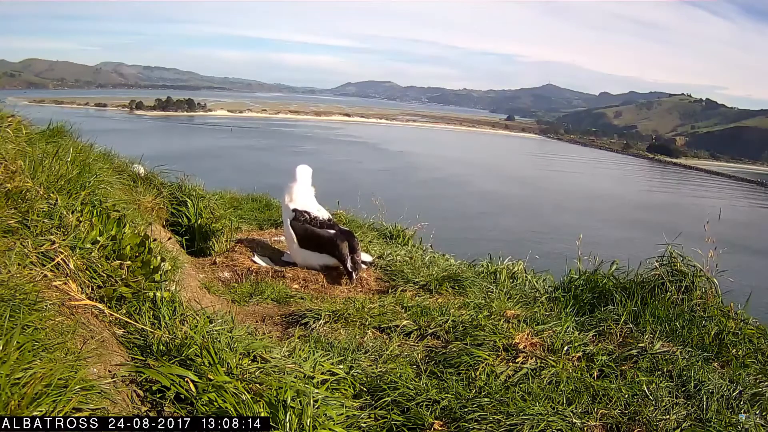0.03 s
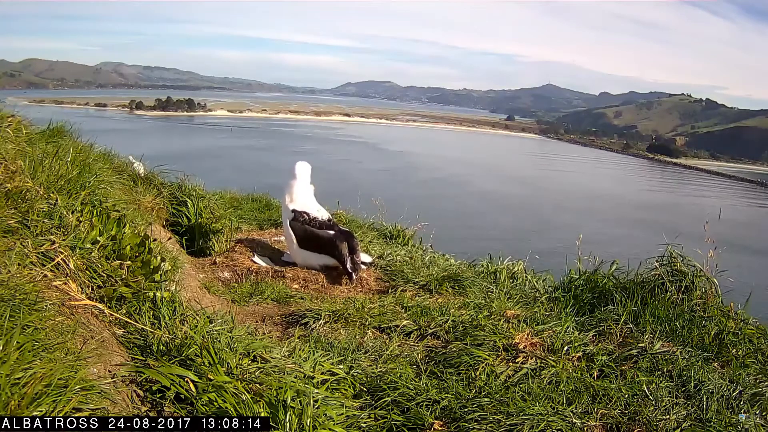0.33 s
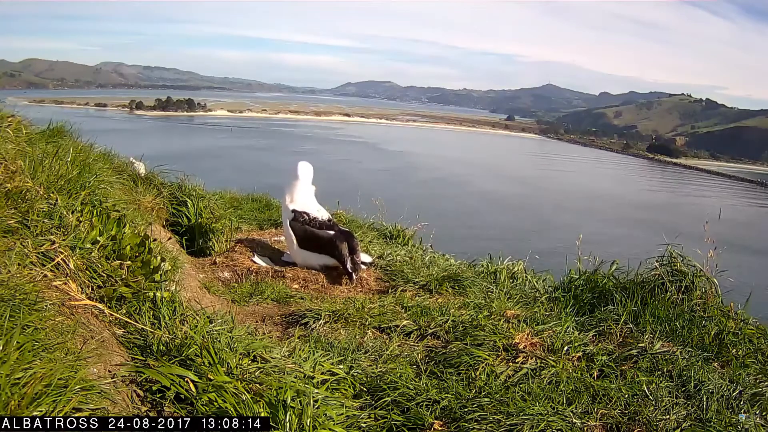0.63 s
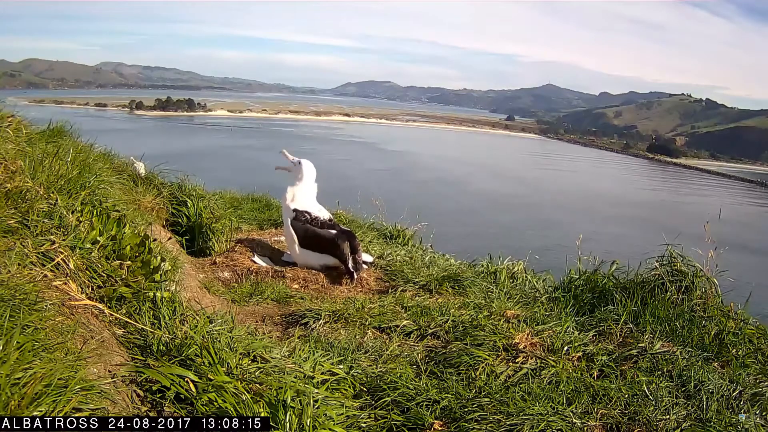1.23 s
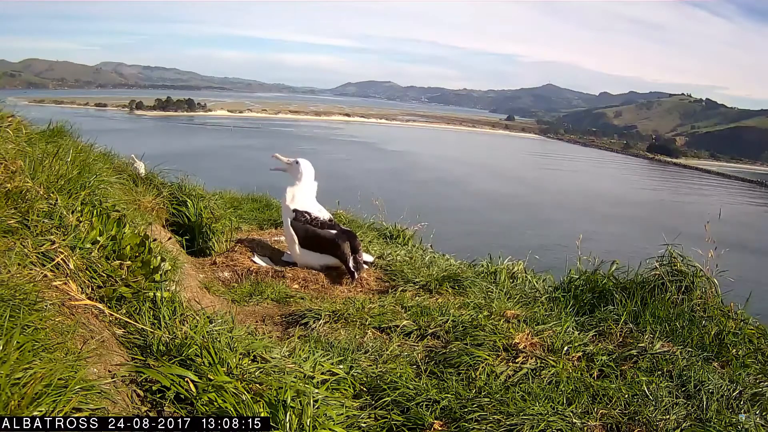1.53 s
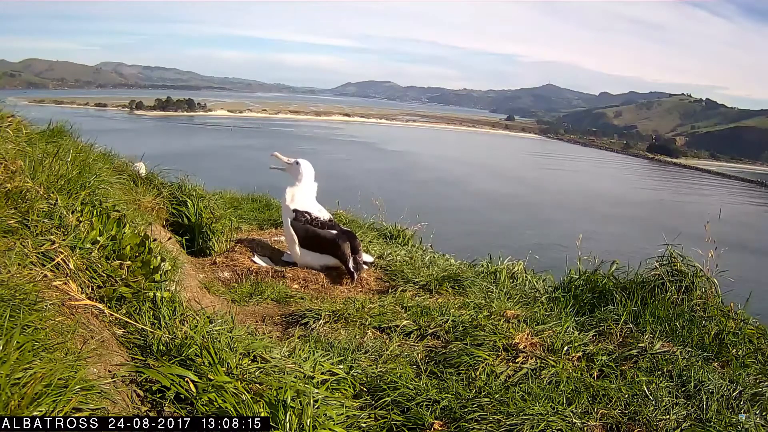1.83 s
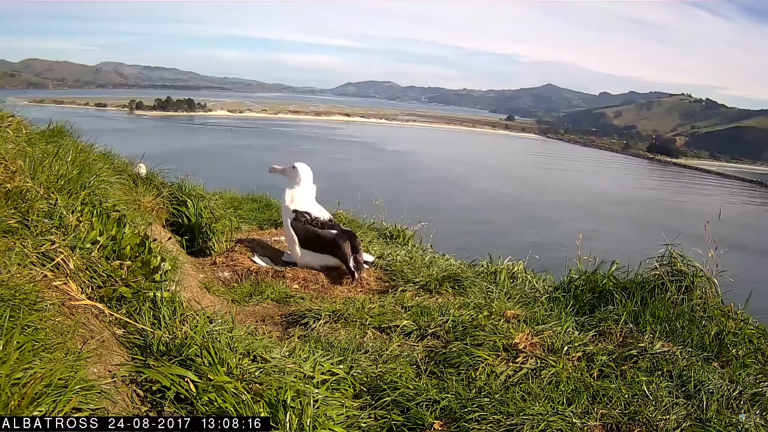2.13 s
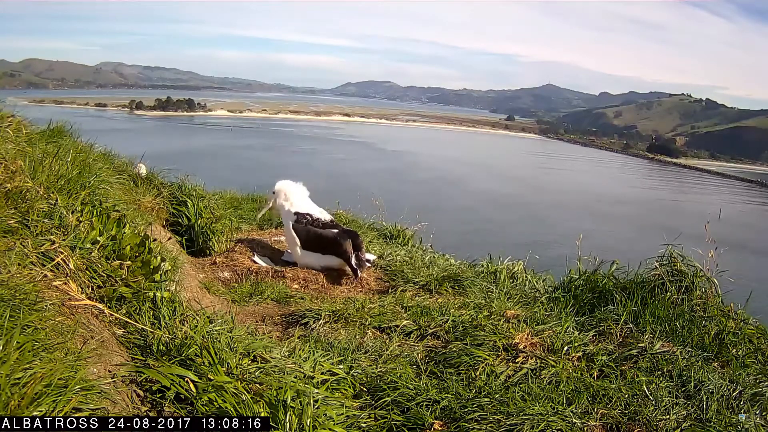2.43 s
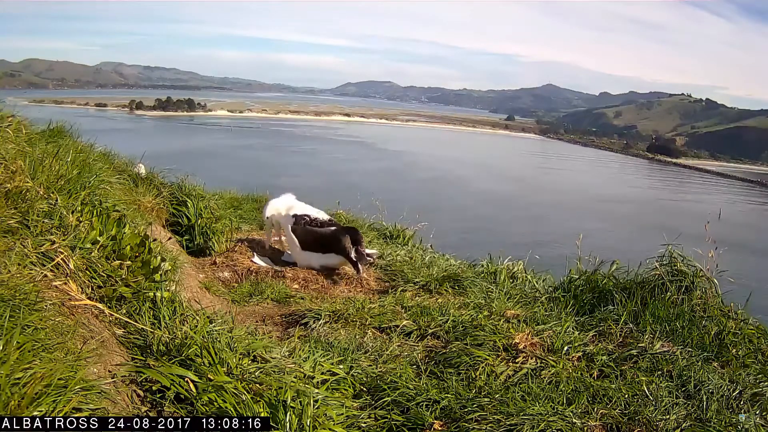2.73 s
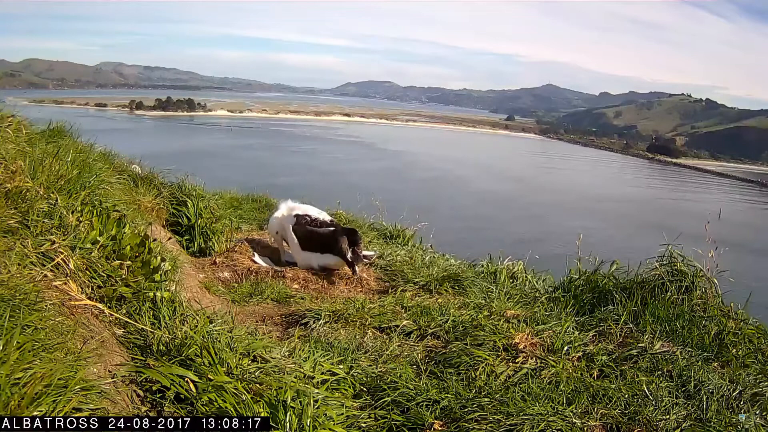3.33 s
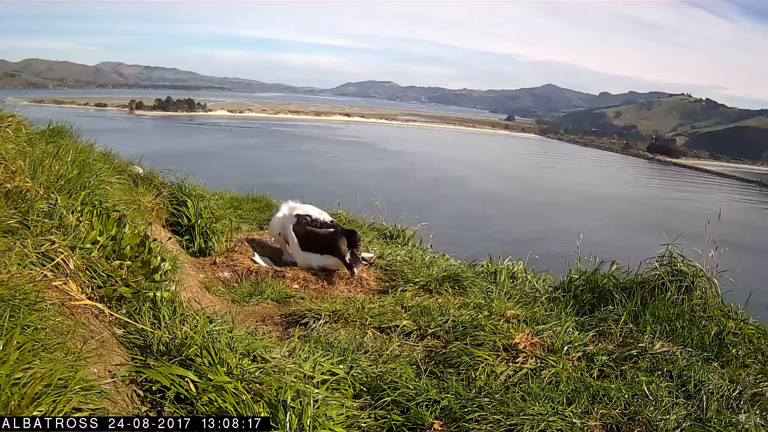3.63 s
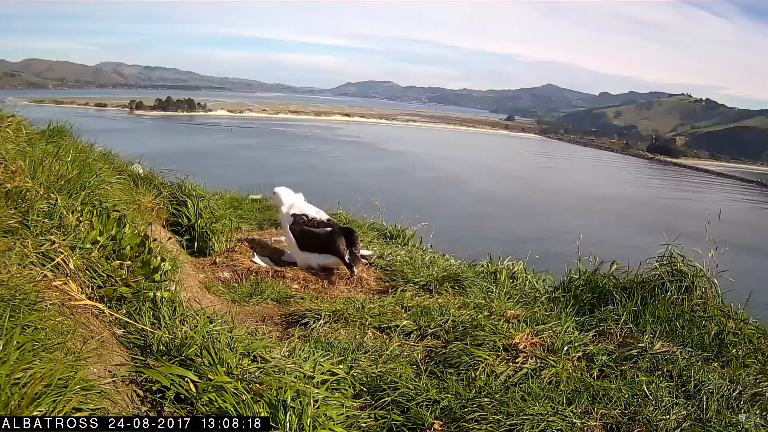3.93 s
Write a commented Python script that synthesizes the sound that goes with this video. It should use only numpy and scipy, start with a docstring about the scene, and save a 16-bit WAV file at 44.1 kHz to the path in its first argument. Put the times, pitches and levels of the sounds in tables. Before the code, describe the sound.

Bill claps and squealing, gliding cries from an albatross, with low wind and microphone clicks.

```python
"""An albatross at its nest on a windy headland claps its bill eight times, then points it skyward and gives six wavering cries.
The cries are a gliding harmonic whistle shaped by fixed resonances; wind rumbles underneath.
A narrow-band field camera picks it up: it folds high partials back down, clicks, and drops out for moments."""
import sys
import numpy as np
from scipy import signal
from scipy.fft import rfft, irfft
from scipy.io import wavfile
from scipy.ndimage import uniform_filter1d

SR = 44100
rng = np.random.default_rng(int(sys.argv[2]) if len(sys.argv) > 2 else 0)


def waveform_to_disk(signal):
    """Save audio, clipped to [-1, 1], as 16-bit WAV at the path in sys.argv[1]."""
    frames = np.transpose(np.atleast_2d(signal))
    scaled = np.clip(frames, -1, 1) * 32767
    samples = np.round(scaled).astype(np.int16)
    wavfile.write(sys.argv[1], SR, samples)


N = 176400

# cries, one table each (s, pitch Hz, effort dB)
CRY_1 = [(0.555, 690, -18.5), (0.568, 880, -7.5), (0.585, 1430, -31), (0.6, 2450, -25),
         (0.692, 3360, -13.5), (0.721, 2950, -15), (0.726, 2870, -7.5), (0.751, 2620, -9.5), (0.78, 2580, -8.5), (0.801, 2340, -7),
         (0.811, 1710, -16), (0.822, 1350, -6), (0.828, 600, -11)]
CRY_2 = [(0.96, 387, -9.5), (0.981, 553, -2), (0.994, 900, -4), (1.01, 1507, -12), (1.026, 1976, -18.5), (1.029, 2470, -17.5), (1.061, 2794, -11),
         (1.081, 3346, -13), (1.112, 2960, -11.5), (1.12, 2733, -3.5), (1.17, 2376, -8), (1.189, 2463, -7.5), (1.216, 2730, -16.5), (1.242, 2764, -7.5),
         (1.27, 2577, -5.5), (1.324, 2520, -6.5), (1.355, 2864, -14.5), (1.378, 3150, -15), (1.412, 2720, -3.5), (1.445, 2312, -5),
         (1.452, 1976, -9), (1.487, 1976, -22), (1.502, 2600, -17), (1.55, 3213, -18.5), (1.577, 2800, -2),
         (1.597, 2288, -12), (1.607, 1400, -7), (1.615, 980, -2.5), (1.624, 588, -17.5)]
CRY_3 = [(1.658, 695, -2.5), (1.7, 888, -8), (1.722, 1492, -15), (1.757, 2500, -23), (1.786, 2690, -16),
         (1.806, 2634, -14.5), (1.811, 2312, -3.5), (1.823, 1395, -9.5), (1.839, 654, -13)]
CRY_4 = [(1.868, 579, -12), (1.885, 818, -15.5), (1.91, 976, -3), (1.923, 1210, -1.5), (1.937, 1493, -11), (1.951, 2072, -7.5), (1.957, 2550, -3.5),
         (1.985, 2708, 0), (2.014, 2650, -0.5), (2.031, 2378, -0.5), (2.045, 1502, -17), (2.062, 1196, -6.5),
         (2.079, 1195, -4), (2.096, 1238, -8), (2.114, 1400, -20), (2.137, 1310, -19), (2.167, 2515, -10), (2.188, 2850, -9.5), (2.189, 3030, 1),
         (2.224, 2363, -0.5), (2.24, 984, -21)]
CRY_5 = [(2.351, 881, -6), (2.37, 1150, -16.5), (2.39, 1766, -14.5), (2.407, 2555, -15.5), (2.42, 2600, -5), (2.456, 2558, -8),
         (2.471, 2384, -7.5), (2.483, 1600, -22), (2.491, 907, -22.5)]
CRY_6 = [(3.675, 897, -9), (3.692, 875, -13.5), (3.702, 1183, -5.5), (3.726, 1182, -13), (3.742, 1510, -13.5), (3.756, 1750, -17), (3.775, 1765, -18),
         (3.779, 1596, -4), (3.795, 1236, -10.5), (3.809, 1009, 5.5), (3.822, 660, -10)]
# resonances that the cries pass through (Hz, dB)
THROAT = [(400, -37), (650, -20.5), (800, -18.5), (1020, -16.5), (1220, -33), (1400, -22), (1520, -14.5), (1700, -28.5), (2050, -22.5), (2230, -16.5), (2360, -7), (2500, -12), (2700, -15), (2900, -16.5), (3250, -23), (3550, -20), (3800, -27), (4300, -48.5)]
# partials of the voice (multiple, dB)
PARTIALS_DB = [-0.5, -8.5, -20.5, -29]
JITTER, SHIMMER_DB = .0016, .35  # fixed
# hoarse onsets of the voice (s, length s, level dB)
CROAKS = [(0.964, 0.022, -23)]
CROAK_HZ = 175.7
CROAK_COLOUR = [(200, -6), (600, -2.5), (850, 12), (1100, -13.5), (1500, -4), (4000, -45)]  # (Hz, dB)
# bill claps (s, level of the hollow thump dB, level of the snap dB)
CLAPS = [(.0405, -2.5, -5.5), (.1405, -2, -4), (.217, -0.5, -2), (.311, -0.5, -2), (.407, -1.5, -4.5), (.511, -3, -6.5), (.599, -3.5, -7), (.699, -5, -7.5)]
# soft bill taps while the bird settles and preens (s, thump dB, snap dB)
TAPS = [(2.314, -12, -14), (2.88, -12, -19.5), (3.205, -17, -14), (3.535, -34, -13), (3.576, -17, -14)]
# modes of the snap (Hz, dB, t60 s)
BILL = [(984, -18, 0.028), (1396, -24, 0.019), (2124, -32, 0.033), (2350, -25.5, 0.041), (3410, -39, 0.029)]
THUMP_HZ, THUMP_DB, THUMP_LAG_S, THUMP_RISE_S, THUMP_T60_S = 328, 7.5, 0.00078, 0.0036, 0.021
# wind and sea (Hz, dB per Hz)
WIND = [(24, -43), (45, -2), (141, -1), (264, -5.5), (415, -7.5), (458, -12.5), (592, -22), (895, -13), (1160, -20.5),
        (1300, -27.5), (1890, -31), (2590, -31), (3830, -35), (4400, -39), (5720, -75)]
WIND_DB, GUST_DB, FLICKER_DB = -32, -0.17, 0.8
# low buffets of wind (s, width s, dB)
BUFFETS = [(2.871, 0.024, -35.5)]
HUM_HZ, HUM_DB, HUM_WAVER = 124, -39.5, .025
# faint twittering in the treble
TWITTER_PER_S, TWITTER_HZ, TWITTER_SPREAD_HZ, TWITTER_S, TWITTER_SWEEP_HZ, TWITTER_DB = 75, 3350, 500, .015, 600, -52.5
# dropouts of the camera (start s, length s, level of the clicks at both edges dB)
DROPOUTS = [(.126, .011, -25), (.752, .018, -24), (.857, .011, -29), (1.745, .012, -34), (1.851, .010, -22), (2.112, .026, -36), (2.424, .009, -23), (2.739, .011, -36), (3.051, .014, -36), (3.157, .035, -26), (3.267, .080, -38), (3.708, .016, -42)]  # fixed
# clicks of the camera (s, dB)
CLICKS = [(.189, -28.5), (.822, -16.5), (1.809, -19.5), (1.914, -15.5), (2.191, -28), (2.264, -28.5), (2.487, -29), (2.802, -24.5), (3.117, -32), (3.245, -28), (3.412, -22), (3.417, -24.5), (3.441, -25)]
SHARP_TICK_S, SHARP_TICK_DB = 3.423, -23  # fixed
CAMERA_RATE_HZ = 8000  # fixed
CAMERA_LOW_HZ, HISS_DB = 50.5, -85
CAMERA_BAND = [(3000, 0), (3900, 4), (4300, -6), (4700, -29.5), (5200, -52.5), (7000, -70.5)]  # (Hz, dB)
CLICK_BAND = [(300, -7.5), (1400, 8), (3500, -0.5), (4900, -6), (5700, -35.5), (10000, -52.5)]  # (Hz, dB)
TOP_HZ = 15700  # fixed
CRY_ATTACK_S, CRY_RELEASE_S, GLIDE_S = 0.014, 0.006, .006
# stretches where the voice turns hoarse (s, width s, roughness 0-1)
HOARSE = [(.68, 0.037, 0.45), (1.171, 0.005, 0.65), (1.609, 0.015, 0.2), (3.71, 0.046, 0.3)]
ROUGH, ROUGH_HZ = 0.08, 750
FOLD_BAND = [(4000, -55.5), (4550, -18), (5000, -32.5), (5600, -57)]  # partials that fold back down (Hz, dB)
# brightness of each cry (dB per partial)
CRY_BRIGHT_DB = [-7, -3, -3, 3.5, 9, -6.5]
SWELL_S = .004  # fixed
DROP_EDGE_S = .001  # fixed
# the two contacts of a clap: the time between them and the crack of each
SHUT_LAG_S, CRACK_DB, CRACK_T60_S = .0032, -31.5, .014


def undb(db):
    """Decibels to gain."""
    return 10 ** (np.asarray(db) / 20)


def unit(x):
    """Scale to rms 1."""
    return x / np.sqrt(np.mean(x ** 2))


def response(hz, points):
    """Gain at a frequency, from (Hz, dB) points."""
    p = np.array(points, float)
    return undb(np.interp(np.log(np.maximum(hz, 1)), np.log(p[:, 0]), p[:, 1]))


def colour(x, points):
    """Causal filter from (Hz, dB) points, so that its peaks ring."""
    cepstrum = irfft(np.log(response(np.arange(N + 1) * SR / (2 * N), points)))
    cepstrum[1:N] *= 2
    cepstrum[N + 1:] = 0
    return irfft(rfft(x, 2 * N) * np.exp(rfft(cepstrum)))[:N]


def band(x, lo_hz, hi_hz):
    """Band-pass."""
    return signal.sosfilt(signal.butter(2, [lo_hz, hi_hz], "band", fs=SR, output="sos"), x)


def smooth(x, seconds):
    """Moving average."""
    return uniform_filter1d(x, max(int(seconds * SR), 1), mode="nearest")


def walk(rate):
    """Slow chance with a spread of 1."""
    k = int(SR / rate)
    return unit(smooth(smooth(np.repeat(rng.standard_normal(N // k + 1), k)[:N], 1 / rate), 1 / rate))


def cry(table, bright_db):
    """A gliding, slightly rough whistle whose partials flare as they cross resonances; those above the camera's band fold back down."""
    t = np.arange(N) / SR
    s, pitch, effort = np.array(table, float).T
    hz = smooth(np.interp(t, s, pitch), GLIDE_S) * (1 + JITTER * walk(300))
    gain = undb(smooth(np.interp(t, s, effort), SWELL_S) + SHIMMER_DB * walk(170))
    gain = gain * np.clip((t - s[0]) / CRY_ATTACK_S, 0, 1) * np.clip((s[-1] - t) / CRY_RELEASE_S + 1, 0, 1)
    rough = ROUGH + sum(r * np.exp(-.5 * ((t - at) / width) ** 2) for at, width, r in HOARSE)
    grain = (1 + rough * (walk(2 * ROUGH_HZ) + 1j * walk(2 * ROUGH_HZ))) / np.sqrt(1 + 2 * rough ** 2)
    on, voice, fold = gain > 0, np.zeros(N), np.zeros(N)
    phase = 2 * np.pi * np.cumsum(hz[on]) / SR
    for k, db in enumerate(PARTIALS_DB, 1):
        partial = undb(db + bright_db * (k - 1)) * (gain * grain)[on] * np.exp(1j * k * phase)
        voice[on] += partial.imag
        fold[on] += response(k * hz[on], FOLD_BAND) * (partial * np.exp(-2j * np.pi * CAMERA_RATE_HZ * t[on])).imag
    return colour(voice, THROAT) + fold


def croaks():
    """Uneven throat pulses before the voice finds its pitch."""
    t = np.arange(N) / SR
    cycles = np.floor(np.cumsum(CROAK_HZ * (1 + .2 * walk(200))) / SR)
    rasp = unit(colour(unit(np.diff(cycles, prepend=0)) + 0.44 * rng.standard_normal(N), CROAK_COLOUR))
    return rasp * sum(undb(db) * np.sqrt(np.abs(np.sin(np.pi * np.clip((t - s) / length, 0, 1)))) for s, length, db in CROAKS)


def bill(events):
    """The mandibles touch, then shut, each time with a crack and a ring; the hollow of the closing bill thumps."""
    out, t = np.zeros(N + SR), np.arange(SR // 10) / SR
    late = np.maximum(t - THUMP_LAG_S, 0)
    for s, thump_db, snap_db in events:
        i = int(s * SR)
        for lag in (0, SHUT_LAG_S * (1 + .1 * rng.standard_normal())):
            detune = 1 + 0.025 * rng.standard_normal(len(BILL) + 1)
            ring = sum(undb(db + 2 * rng.standard_normal() - 60 * t / t60) * np.sin(2 * np.pi * hz * d * t) for (hz, db, t60), d in zip(BILL, detune))
            crack = undb(CRACK_DB + 2 * rng.standard_normal() - 60 * t / CRACK_T60_S) * rng.standard_normal(len(t))
            j = i + int(lag * SR)
            out[j:j + len(t)] += undb(snap_db) * (ring + crack)
        thump = (1 - np.exp(-(late / THUMP_RISE_S) ** 2)) * undb(THUMP_DB - 60 * late / THUMP_T60_S) * np.sin(2 * np.pi * THUMP_HZ * detune[-1] * late)
        out[i:i + len(t)] += undb(thump_db) * thump
    return out[:N]


def wind():
    """Octave bands swell together and flicker alone, with a low buffet and a wavering hum."""
    t = np.arange(N) / SR
    noise, gust = rng.standard_normal(N), GUST_DB * walk(3)
    spectrum, hz = rfft(noise), np.arange(N // 2 + 1) * SR / N
    octave = np.clip(np.log2(np.maximum(hz, 1) / 32), 0, 7)  # fixed
    air = sum(irfft(spectrum * response(hz, WIND) * np.maximum(1 - abs(octave - k), 0), N) * undb(gust + FLICKER_DB * walk(20)) for k in range(8))
    buffet = unit(band(rng.standard_normal(N), 150, 400)) * sum(undb(db) * np.exp(-.5 * ((t - s) / width) ** 2) for s, width, db in BUFFETS)
    hum = np.sin(2 * np.pi * np.cumsum(HUM_HZ * (1 + HUM_WAVER * walk(14))) / SR) * undb(1.3 * walk(7.1))
    return undb(WIND_DB) * unit(air) + buffet + undb(HUM_DB) * unit(hum)




def clicks():
    """Dull electrical clicks, alone and at both edges of each dropout, and one sharp tick."""
    spikes, tick = np.zeros(N), np.zeros(N)
    edges = [(at, db) for s, length, db in DROPOUTS for at in (s, s + length)]
    for s, db in CLICKS + edges:
        spikes[int(s * SR)] = undb(db) * SR / CAMERA_RATE_HZ
    tick[int(SHARP_TICK_S * SR)] = undb(SHARP_TICK_DB)
    return colour(spikes, CLICK_BAND) + tick


def twitter():
    """Tiny random chirps just above the hiss."""
    out, u = np.zeros(N + SR), np.linspace(0, 1, int(TWITTER_S * SR))
    for at, a, b, c in rng.random((int(TWITTER_PER_S * N / SR), 4)):
        hz = TWITTER_HZ + TWITTER_SPREAD_HZ * (2 * a - 1) + TWITTER_SWEEP_HZ * (2 * b - 1) * (u - .5)
        i = int(at * N)
        out[i:i + len(u)] += (.5 + c) * np.sin(np.pi * u) * np.sin(2 * np.pi * np.cumsum(hz) / SR)
    return undb(TWITTER_DB) * out[:N]


def scene():
    """The bird over the wind."""
    cries = sum(cry(table, db) for table, db in zip((CRY_1, CRY_2, CRY_3, CRY_4, CRY_5, CRY_6), CRY_BRIGHT_DB))
    return (cries + croaks() + bill(CLAPS) + bill(TAPS) + wind() + twitter())[None]


def record(dry):
    """The camera mutes in each dropout, keeps a narrow band, cuts the deep bass and clicks."""
    live = np.ones(N)
    for s, length, _ in DROPOUTS:
        live[int(s * SR):int((s + length) * SR)] = 0
    x = colour(dry[0] * smooth(live, DROP_EDGE_S), CAMERA_BAND)
    x = signal.sosfilt(signal.cheby1(10, .5, 4900, fs=SR, output="sos"), x)  # fixed
    x = signal.sosfilt(signal.butter(6, CAMERA_LOW_HZ, "high", fs=SR, output="sos"), x)
    x = x + clicks() + undb(HISS_DB) * rng.standard_normal(N)
    return signal.sosfilt(signal.ellip(8, .2, 70, TOP_HZ, fs=SR, output="sos"), x)[None]


dry = scene()
out = record(dry)
waveform_to_disk(out)
```